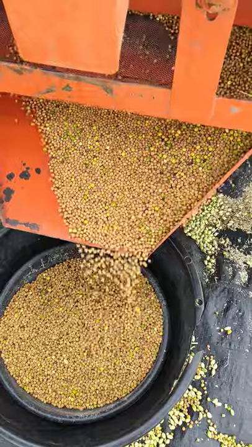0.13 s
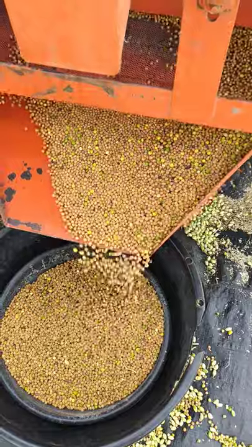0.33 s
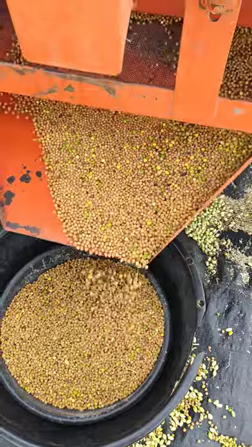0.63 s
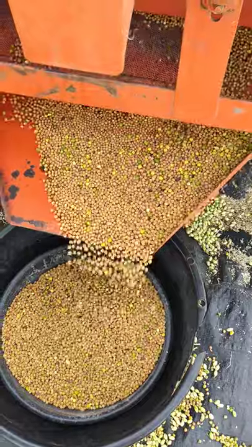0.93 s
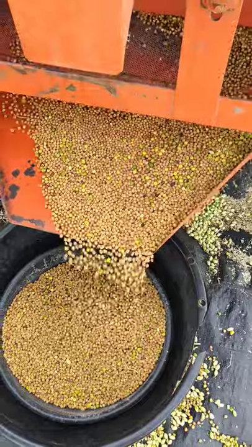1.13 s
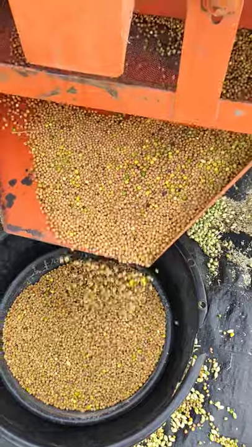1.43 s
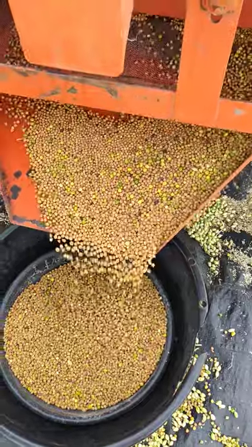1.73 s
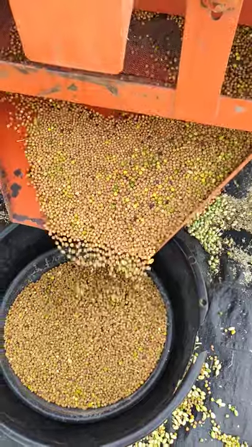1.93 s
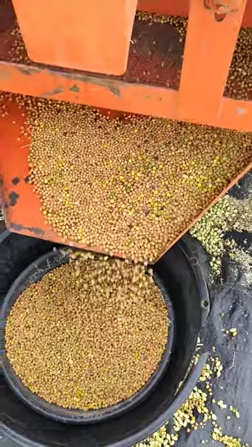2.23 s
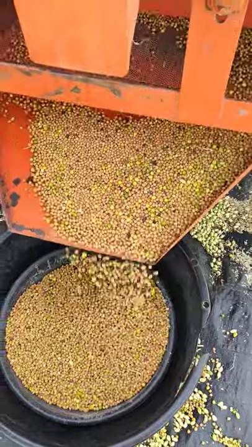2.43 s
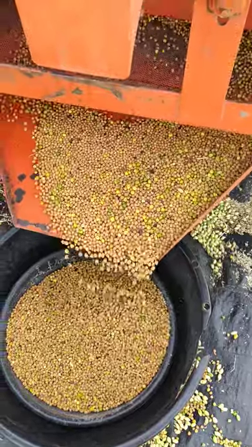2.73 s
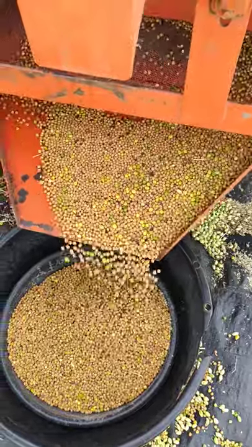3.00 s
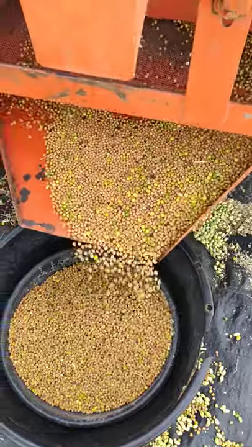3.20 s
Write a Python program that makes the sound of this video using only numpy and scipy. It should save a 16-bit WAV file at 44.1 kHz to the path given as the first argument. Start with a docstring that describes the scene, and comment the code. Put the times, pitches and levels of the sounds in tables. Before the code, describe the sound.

A loud farm thresher roars steadily while dry beans rattle down its shaking metal chute

```python
"""Bean thresher at work

A farm thresher runs at a nearly steady speed: engine orders and a fan hum (sines) over the roar of drum
and sheet-metal housing (throbbing noise shaped by resonances). Dry beans rattle down the shaking chute
into a tub in dense random clicks, with sudden showers and small pings on the sheet.
Heard close by through two spaced microphone ports; the sound fades in at the start."""
import sys
import numpy as np
from scipy import signal
from scipy.fft import rfft, irfft
from scipy.io import wavfile

SR = 44100
rng = np.random.default_rng(int(sys.argv[2]) if len(sys.argv) > 2 else 0)


def gain_from_db(level_db):
    """Turn a decibel level (scalar or array-like) into a linear amplitude factor."""
    decades = np.asarray(level_db, float) / 20
    return 10 ** decades


def wav_record(signal):
    """Record a signal, one row per channel, as 16-bit PCM in the file named by sys.argv[1]."""
    frames = np.transpose(np.atleast_2d(signal))
    bounded = np.clip(frames, -1, 1)
    # unit amplitude maps onto the largest positive 16-bit level
    quanta = np.round(bounded * 32767).astype(np.int16)
    wavfile.write(sys.argv[1], SR, quanta)


N = 148176
T = np.arange(N) / SR
# All source levels are those ahead of the fade-in gain and the peak rounding in record().


def rms_one(x):
    """Scale to rms 1."""
    return x / np.sqrt(np.mean(x ** 2) + 1e-20)


def curve(rows, at):
    """Straight lines between rows."""
    return np.interp(at, *np.transpose(rows))


def at_hz(rows, hz):
    """Straight lines on a log-frequency axis."""
    row_hz, values = np.transpose(rows)
    return np.interp(np.log(hz + 1), np.log(row_hz), values)


def drift(rate_hz):
    """Slow random wander of spread 1: noise through two equal one-pole low-passes at rate_hz."""
    # computed at every 40th sample, then joined by straight lines
    pole = np.exp(-80 * np.pi * rate_hz / SR)
    noise = rng.standard_normal(N // 40 + 2002)
    slow = signal.lfilter([1], [1, -2 * pole, pole * pole], noise)[2000:]
    slow = rms_one(slow - slow.mean())
    return np.interp(np.arange(N) / 40, np.arange(len(slow)), slow)


# How alike the two ports hear a noise: pitch_hz, likeness (0-1)
PORT_LIKENESS = [(30, 0.88), (80, 0.96), (200, 1), (350, 0.94), (500, .8), (800, 0.8), (1100, 0.45),
                 (1500, 0.52), (2300, 0.29), (3500, 0.19), (6000, 0.14), (9000, .15), (15000, .1)]
# Level balance of the ports: pitch_hz, left_minus_right_db
PORT_LEAN = [(60, 3.5), (180, -3), (260, 5.5), (380, 2), (480, 1.5), (600, -0.5), (850, -4), (1050, -0.5),
             (1300, -2.5), (1700, -1.5), (2400, 4.5), (4500, 4), (6000, 0.5), (7000, -5.5), (8800, -8),
             (10000, 2.5), (15000, .5)]
# Phase between the ports: pitch_hz, left_lead_rad
PORT_LEAD = [(0, 0), (250, 0.2), (360, -1.1), (450, -1.88), (690, -2.5), (1120, -2.5), (1500, -2),
             (2300, -6), (3000, -8.5), (16000, -49.5)]


def at_ports(pair, colour):
    """Two unrelated draws of one source, coloured, then mixed so the spaced ports agree less up high; rms 1."""
    hz = np.fft.rfftfreq(N, 1 / SR)
    left, other = rfft(pair) * colour(hz)
    alike = np.clip(at_hz(PORT_LIKENESS, hz), 0, 1)
    right = alike * left + np.sqrt(1 - alike ** 2) * other
    right = right * np.exp(-1j * curve(PORT_LEAD, hz))
    lean = gain_from_db(at_hz(PORT_LEAN, hz) / 2)  # half the difference on each side
    return rms_one(irfft(np.array([left * lean, right / lean]), N))


# Relative noise spectrum of drum and housing: pitch_hz, density_db (per Hz)
ROAR_COLOUR = [(10, -40), (30, -41), (55, -28), (80, -13), (120, -8), (170, -2.5), (230, 2), (290, -6),
               (350, -0.5), (400, -8.5), (480, -5.5), (560, -1), (660, -2), (760, -4), (880, -13),
               (1050, -11), (1300, -16), (1750, -20), (2300, -21.5), (3500, -27.5), (16000, -35.5)]
# Resonances of the housing panels: pitch_hz, width_hz (where the dB lift halves), lift_db
PANEL_RESONANCES = [(129.4, 13, 8), (332, 24, 9.5), (377.5, 28, 4), (397, 9.6, 2.5), (458, 21, 4),
                    (550, 26, 2), (575, 9.7, 4), (659, 15, 7.5), (678.3, 14, 7.5), (693, 9.1, 5),
                    (736, 13, 9.5), (798.7, 17.4, 10.5), (824.5, 10, 11), (849.4, 11.4, 12.5),
                    (925, 15, 10)]


def housing(hz):
    """Each panel of the housing lifts the noise around its own resonance."""
    lift_db = sum(db / (1 + (2 * (hz - f) / width) ** 2) for f, width, db in PANEL_RESONANCES)
    return gain_from_db(at_hz(ROAR_COLOUR, hz) + lift_db)


# Level of the roar, uneven by chance from moment to moment: time_s, level_db (rms)
ROAR_LEVEL = [(.17, -14), (.24, -11.5), (.32, -14), (.45, -16.5), (.72, -13.5), (1.0, -15), (1.5, -15),
              (1.98, -14.5), (2.11, -19), (2.16, -13.5), (2.34, -17), (2.5, -13.5), (2.65, -17),
              (2.77, -16.5), (3.0, -15.5), (3.36, -16)]
THROB, DOUBLE_THROB = .13, .15  # depth at the firing rate and at twice that rate
FLICKER_DB = .6  # spread


def roar(turns):
    """Noise that throbs with the firing, ringing in the panels of the housing."""
    throb = 1 + THROB * np.cos(2 * np.pi * turns) + DOUBLE_THROB * np.cos(4 * np.pi * turns)
    noise = rng.standard_normal((2, N)) * throb * gain_from_db(FLICKER_DB * drift(29))
    return gain_from_db(curve(ROAR_LEVEL, T)) * at_ports(noise, housing)


# Fan tones: pitch_hz, level_db (rms, mean of the ports' dB)
FAN_TONES = [(39.5, -63), (79.0, -38.5)]


def fan():
    """The fan hums in steady sines, a touch louder and earlier in phase on the right."""
    out = np.zeros((2, N))
    for hz, db in FAN_TONES:
        level = np.sqrt(2) * gain_from_db(db + np.array([[-.5], [.5]]))
        phase = 2 * np.pi * (hz * T + rng.random()) + np.array([[0], [.15]])
        out += level * np.sin(phase)
    return out


# Engine orders: multiple (of the firing rate, rounded to a whole number when played),
# left_db, right_db (rms, about which each wavers), left_lag_rad
ENGINE_ORDERS = [(3.996, -36.5, -36.5, 0.16), (6.048, -29.5, -30, 0.36), (8.965, -28, -27.5, 0.51),
                 (9.9, -32.5, -41, 0.53), (12.05, -24.5, -29, 0.34), (13.89, -33, -43.5, 2.1),
                 (16.97, -56, -33.5, 2.76), (19.04, -36.5, -27, 2.3), (20.12, -33.5, -46, 2.4),
                 (29.56, -47, -41.5, 1.95), (32.4, -40.5, -43.5, 2.9), (33.1, -43.5, -51, 5.1),
                 (34.06, -46, -49, 0.71), (35.5, -46, -44, 2.9)]
ORDER_WAVER_DB, ORDER_WOBBLE_RAD = 3.0, .35  # spreads of level and phase


def engine_orders(turns):
    """Whole multiples of the firing rate, each wavering slowly in level and wobbling in phase."""
    out = np.zeros((2, N))
    for multiple, left_db, right_db, left_lag in ENGINE_ORDERS:
        phase = 2 * np.pi * (round(multiple) * turns + rng.random())
        phase = phase + ORDER_WOBBLE_RAD * drift(6.5) + np.array([[0], [left_lag]])
        level_db = np.array([[left_db], [right_db]]) + ORDER_WAVER_DB * drift(2.56)
        out += np.sqrt(2) * gain_from_db(level_db) * np.sin(phase)
    return out


TICKS_PER_S, TICKS_DB = 400, -38  # rate on each side; rms level of the whole layer
TICK_CYCLES = 7.0  # cycles for a ring to fall 60 dB


def ticks():
    """Single beans ping on the sheet: short rings at one of twelve pitches, unrelated left and right."""
    size = gain_from_db(3.0 * np.minimum(rng.exponential(1, (2, N)), 4))
    hits = size * (rng.random((2, N)) < TICKS_PER_S / SR)
    pitches_hz = np.geomspace(1600, 5200, num=12)
    dealt = rng.integers(0, 12, (2, N))
    out = 0
    for k, hz in enumerate(pitches_hz):
        decay = gain_from_db(-60 * hz / (TICK_CYCLES * SR))
        turn = 2 * np.pi * hz / SR
        struck = hits * (dealt == k) + 1e-18  # the tiny offset keeps the filter off denormals
        resonator = [1, -2 * decay * np.cos(turn), decay * decay]
        out = out + signal.lfilter([0, np.sin(turn)], resonator, struck)
    return gain_from_db(TICKS_DB) * rms_one(out)


BEANS_PER_S, BEAN_SPREAD_DB = 22000, 2.6  # rate in each draw; scale of the random size


def clicks():
    """Dense random bean impacts of uneven size and either sign, in two unrelated draws."""
    size = gain_from_db(BEAN_SPREAD_DB * np.minimum(rng.exponential(1, (2, N)), 5))
    sign = rng.choice([-1, 1], (2, N))
    return size * sign * (rng.random((2, N)) < BEANS_PER_S / SR)


# Relative colour of the bean rattle: pitch_hz, density_db (per Hz)
BEAN_COLOUR = [(700, -7), (1300, -3.5), (1750, -4), (2100, -.5), (2500, 0), (2900, -1), (3500, -3),
               (4400, -3), (5200, -7), (6000, -12), (7000, -5.5), (8300, -4), (9300, -3), (10500, -3.5),
               (12500, -7.5), (14000, -9), (16000, -9.5)]


def bean_colour(hz):
    """Spectrum that the impacts of the beans share."""
    return gain_from_db(at_hz(BEAN_COLOUR, hz))


# Level of the steady rattle, uneven from moment to moment: time_s, level_db (rms, before flutter)
BEAN_FLOW = [(.17, -23), (.24, -25), (.3, -29.5), (.45, -26.5), (.6, -26), (.72, -25.5), (.78, -29),
             (.86, -25), (1.0, -25.5), (1.16, -29.5), (1.23, -27.5), (1.33, -29), (1.55, -25.5),
             (1.78, -24.5), (1.88, -26), (2.02, -27), (2.08, -25.5), (2.24, -25.5), (2.36, -29),
             (2.47, -26), (2.62, -31), (2.72, -29), (2.86, -27), (2.99, -27), (3.03, -24), (3.12, -25),
             (3.19, -29), (3.36, -26)]
FLOW_FLUTTER_DB = .6  # spread


def rattle():
    """The steady stream of beans on chute and heap: coloured clicks that flutter in level."""
    level = gain_from_db(curve(BEAN_FLOW, T) + FLOW_FLUTTER_DB * drift(22))
    return level * at_ports(clicks(), bean_colour)


# Showers of beans: start_s, hiss_db (rms), rise_s, hold_s, clatter_db (rms)
SHOWER_EVENTS = [(0.282, -26.5, .006, 0.026, -29), (0.34, -25, 0.017, 0.016, -30.5),
                 (0.493, -26, .004, 0.023, -28), (1.098, -22.5, 0.0044, 0.012, -23.5),
                 (1.255, -24.5, 0.0043, 0.0075, -30), (1.404, -29, .005, .01, -29),
                 (1.568, -26, 0.0093, .01, -26.5), (1.65, -27, 0.0089, 0.0083, -39),
                 (1.708, -25.5, 0.011, 0.0091, -32), (1.816, -26.5, .004, 0.0092, -31),
                 (1.907, -23, .015, .015, -29.5), (2.03, -24, .003, 0.0092, -32),
                 (2.088, -29, .003, .003, -31), (2.251, -21, .02, .01, -36),
                 (2.3, -22, 0.0092, 0.016, -28.5), (2.418, -28, .003, .003, -33),
                 (2.507, -24.5, .003, .003, -33), (2.632, -19, .003, 0.011, -30),
                 (2.73, -23.5, .003, 0.024, -29.5), (2.798, -24.5, .006, 0.024, -32),
                 (2.879, -22, 0.011, 0.045, -26.5), (3.228, -27, 0.0073, .005, -32),
                 (3.268, -23, 0.0055, 0.0077, -33)]
# Hiss of a shower against the steady rattle: pitch_hz, tint_db
HISS_TINT = [(700, -30), (3000, -15.5), (5000, -2.5), (8000, -0.5), (12000, -0.5), (15500, 1.5)]
# Clatter of a shower on the chute, against the steady rattle: pitch_hz, tint_db
CLATTER_TINT = [(700, -4), (1500, 0), (4500, -1), (6000, 2), (9000, -25)]
SHOWER_FALL_DB_PER_S = 270


def showers():
    """A shake throws a heap of beans at once: rise, hold, fall; it hisses and clatters."""
    power = np.zeros((2, N))  # rows: hiss, clatter
    for start, hiss_db, rise, hold, clatter_db in SHOWER_EVENTS:
        fall_db = SHOWER_FALL_DB_PER_S * np.maximum(T - start - rise - hold, 0)
        swell = np.clip((T - start) / max(rise, 1e-3), 0, 1)
        power += (swell * gain_from_db(np.array([[hiss_db], [clatter_db]]) - fall_db)) ** 2
    hiss = at_ports(clicks(), lambda hz: bean_colour(hz) * gain_from_db(at_hz(HISS_TINT, hz)))
    clatter = at_ports(clicks(), lambda hz: bean_colour(hz) * gain_from_db(at_hz(CLATTER_TINT, hz)))
    return np.sqrt(power[0]) * hiss + np.sqrt(power[1]) * clatter


FIRING_HZ, SPEED_WANDER = 30.38, .0007  # mean firing rate; its relative spread


def scene():
    """Engine, housing and beans together; roar and orders follow one firing phase."""
    turns = np.cumsum(FIRING_HZ * (1 + SPEED_WANDER * drift(2.02))) / SR
    machine = roar(turns) + fan() + engine_orders(turns)
    beans = ticks() + rattle() + showers()
    return machine + beans


def band_limit(x):
    """A steep low-pass at the top of the band."""
    return signal.sosfilt(signal.butter(12, 16310, fs=SR, output="sos"), x)


# Fade-in, its last gain held to the end: time_s, gain_db
FADE_IN = [(.172, -14.5), (.2, -11), (.225, -6.5), (.26, -3.5), (.33, 2.5)]
START_S = .172  # silence before this
CEILING = .9  # full scale is 1
LOW_CUT_HZ, CUTOFF_HZ = 27, 15480


def record(dry):
    """Fade-in, softly rounded peaks, low cut and a steep top cut."""
    faded = dry * gain_from_db(curve(FADE_IN, T)) * (T >= START_S)
    rounded = faded / (1 + (faded / CEILING) ** 4) ** .25
    low_cut = signal.butter(2, LOW_CUT_HZ, "high", fs=SR, output="sos")
    top_cut = signal.ellip(12, .1, 70, CUTOFF_HZ, fs=SR, output="sos")
    mix = signal.sosfilt(np.vstack([low_cut, top_cut]), rounded)
    return band_limit(mix)


dry = scene()
out = record(dry)
wav_record(out)
```